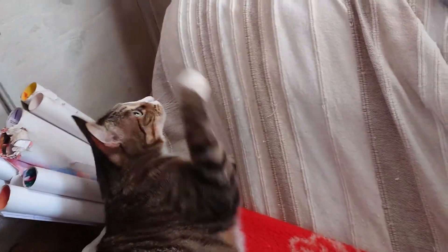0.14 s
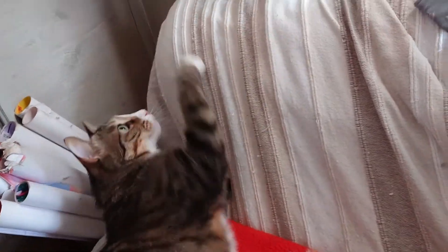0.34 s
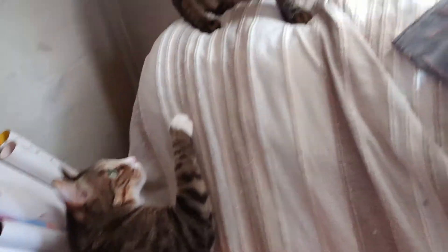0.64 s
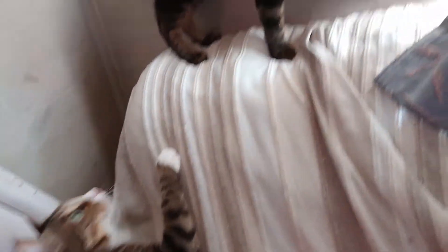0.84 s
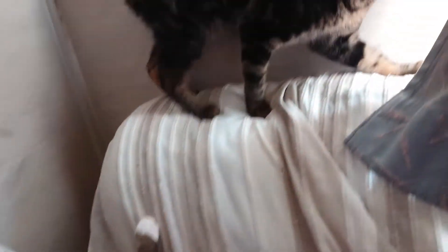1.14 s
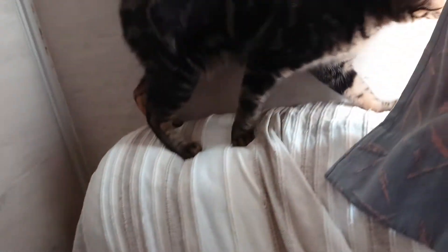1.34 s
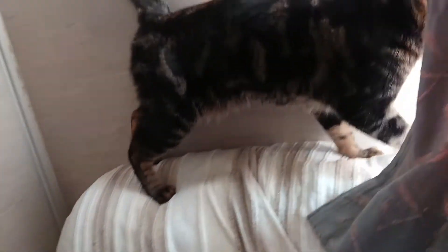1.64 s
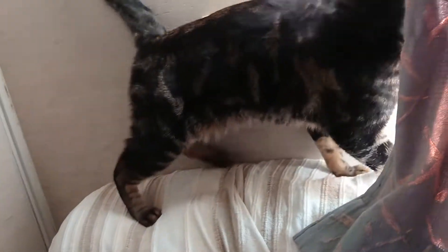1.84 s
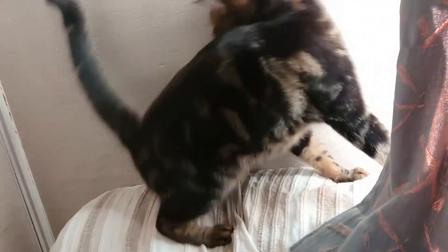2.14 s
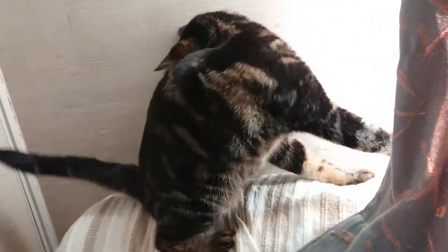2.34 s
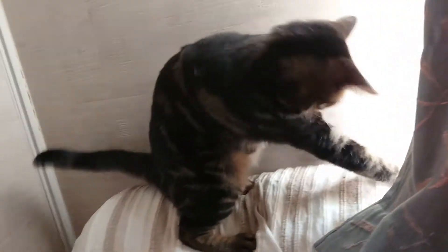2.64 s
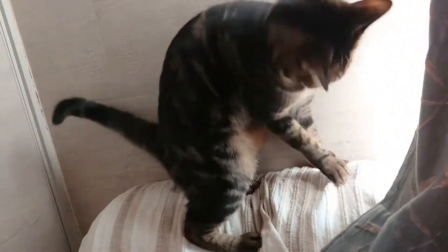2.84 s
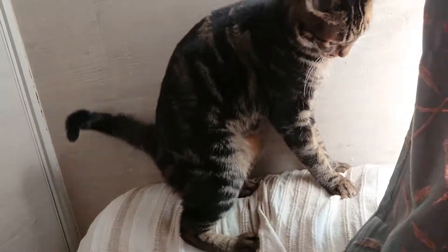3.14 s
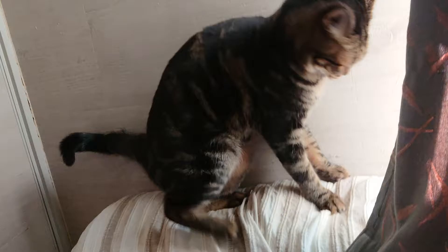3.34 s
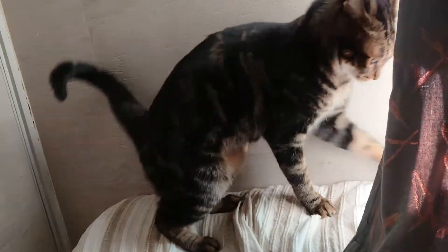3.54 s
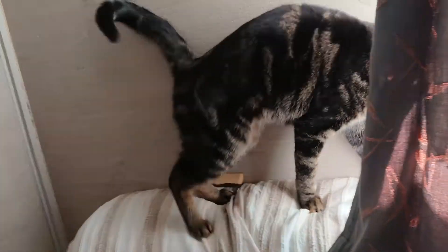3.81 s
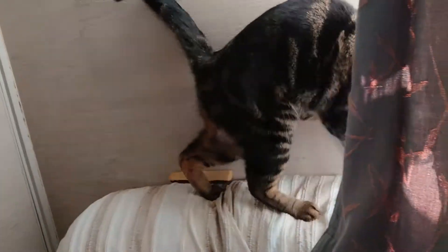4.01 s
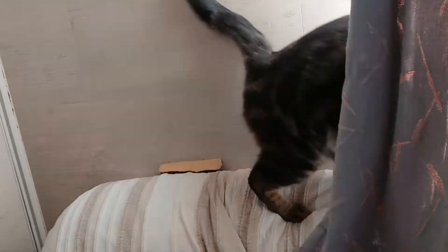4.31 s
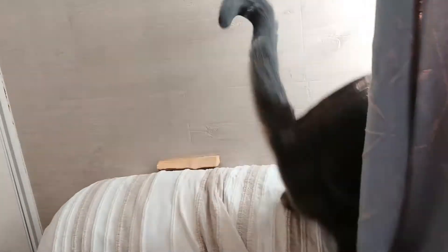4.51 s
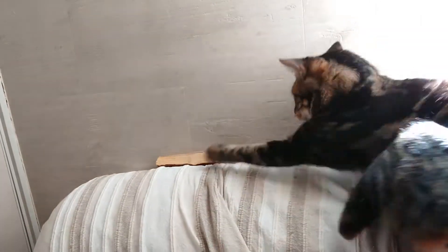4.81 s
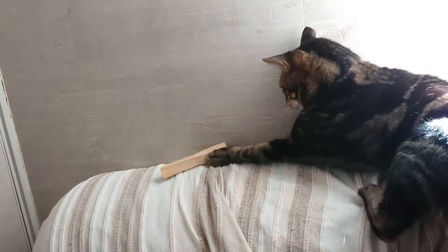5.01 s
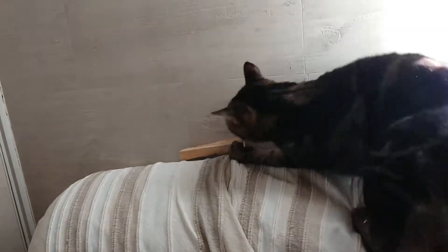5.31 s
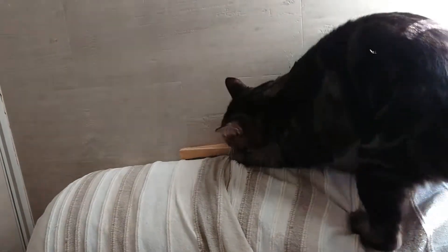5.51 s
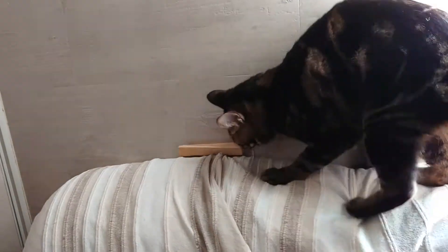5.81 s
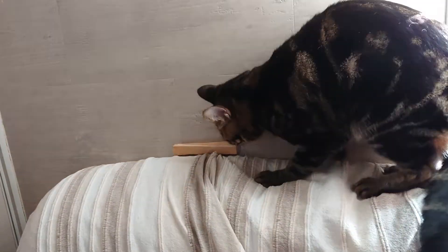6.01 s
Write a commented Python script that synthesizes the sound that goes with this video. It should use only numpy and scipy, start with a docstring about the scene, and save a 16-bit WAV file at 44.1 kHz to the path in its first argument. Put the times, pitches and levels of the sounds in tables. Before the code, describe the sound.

A quiet small room with faint low tone. At about 0.3 s a soft thud is heard, then a sharp wooden knock at 0.45 with a smaller one at 0.57. Until 2 s there is mostly light cloth rub and faint padded thuds. At 2.2-2.4 s a quick rattle of knocks breaks out, led by a hard crack, followed by small taps, low thuds and soft scuffing to 3 s. After a lull, sharp cracks come at 3.7 and 3.8. From 4.3 s scrabbling builds, with a fuller rub at 4.5, dry claw ticks and dull thumps; the strongest knocks fall at 4.87, 5.07 and 5.15, with a thin metallic jingle flickering until about 5.3. Then it calms: isolated taps at 5.4, 5.65 and 5.84 and a faint airy brush. Close stereo pickup, short dense echoes, knocks slightly louder at the right.

```python
"""A soft thud over faint room tone is heard first, then sharp knocks: two cats climb and paw about on a
cloth-covered sofa in a small room and bat a wooden block against the wall. Each blow is a damped wooden
knock, a claw crack that rings the wood and a snap of threads, with dense echoes; bright claw ticks stay dry.
A cat's weight rings the sofa frame, filtered noise makes the cloth rub, narrow resonances make a small
metal thing jingle faintly, and a two-port microphone colours it all."""
import sys
import numpy as np
from scipy import signal
from scipy.fft import rfft, irfft
from scipy.io import wavfile

SR = 44100
rng = np.random.default_rng(int(sys.argv[2]) if len(sys.argv) > 2 else 0)


def master(y):
    """Save y as 16-bit WAV."""
    cut = np.clip(np.atleast_2d(y).T, -1, 1)
    pcm = np.round(cut * 32767)  # scale
    wavfile.write(sys.argv[1], SR, pcm.astype(np.int16))


N = 271656

# Source levels in the tables hold ahead of the stereo balance and the microphone.
# Blows: (time [s], knock peak [dB], knock pitch [Hz], crack rms over its first 5 ms [dB],
#         crack pitch [Hz], snap rms over its first 5 ms [dB])
BLOWS = [(0.442, -23, 606, -48.5, 2900, -66.5), (0.448, -38, 610, -51, 2130, -79),
         (0.512, -44.5, 335, -59.5, 1840, -67), (0.571, -30.5, 693, -60, 2070, -82),
         (0.5745, -31, 399, -71, 2000, -80), (1.626, -45, 269, -69, 2130, -87),
         (1.952, -54.5, 484, -70, 2160, -84), (2.182, -35, 320, -67, 2190, -72),
         (2.245, -23.5, 667, -38, 2120, -76), (2.267, -33, 584, -53, 2400, -66),
         (2.275, -26, 590, -66, 2100, -75), (2.293, -27, 574, -62, 2130, -74),
         (2.299, -38, 630, -57, 2200, -72), (2.307, -35.5, 590, -66, 1500, -80),
         (2.364, -37, 534, -86, 2200, -81), (2.437, -43, 333, -78, 2620, -81),
         (2.478, -44, 400, -62.5, 3020, -74), (2.527, -43.5, 358, -63, 2300, -66),
         (2.636, -65, 340, -58, 2530, -65), (2.656, -42.5, 304, -89, 2100, -67),
         (2.773, -43, 350, -61, 3520, -56), (2.883, -45, 380, -60, 2440, -72),
         (2.903, -43, 530, -80, 1900, -68), (2.929, -42, 480, -66, 1900, -65),
         (3.474, -47, 455, -65.5, 2220, -65.5), (3.573, -48.5, 613, -65.5, 2800, -80),
         (3.6755, -35, 430, -59, 1500, -69), (3.6775, -28.5, 473, -36.5, 1660, -55),
         (3.68, -56, 372, -35, 2290, -67), (3.697, -47, 480, -69, 2250, -80),
         (3.706, -34, 490, -73, 1990, -84), (3.79, -34, 785, -43, 1590, -82),
         (3.797, -41, 610, -55, 2780, -79), (3.811, -42, 600, -78, 1500, -80),
         (3.864, -41.5, 640, -67, 2080, -74), (3.903, -46, 603, -68, 2190, -80),
         (4.277, -51, 251, -63.5, 2550, -63), (4.316, -51.5, 324, -65.5, 1990, -78),
         (4.408, -39, 297, -69, 2000, -84), (4.423, -65, 300, -62, 2760, -77),
         (4.449, -41, 543, -57, 2840, -70), (4.473, -41.5, 290, -60.5, 2780, -82),
         (4.529, -37, 296, -53, 2130, -62.5), (4.577, -34.5, 327, -53.5, 2950, -62),
         (4.631, -46.5, 456, -67, 2490, -77), (4.68, -34.5, 310, -62, 2820, -65),
         (4.689, -41, 397, -66, 2820, -77), (4.784, -30.5, 910, -52.5, 2600, -74),
         (4.828, -33.5, 338, -51.5, 2860, -61), (4.871, -25.5, 372, -35, 2780, -56),
         (4.882, -26, 730, -36, 2190, -50.5), (4.915, -34, 730, -64, 1700, -70),
         (4.977, -33, 298, -47, 1700, -57), (5.068, -23.5, 623, -43.5, 2210, -63),
         (5.1535, -20.5, 580, -44, 2450, -64), (5.238, -37, 363, -45.5, 3140, -55),
         (5.39, -49, 294, -65.5, 2500, -76), (5.635, -47.5, 406, -59, 1880, -71),
         (5.687, -37.5, 270, -54, 2120, -45.5), (5.8405, -28.5, 330, -49, 3120, -57)]
# Modes of the wood that every crack rings: (frequency [Hz], level [dB], t60 of a crack at 2 kHz [s])
WOOD_MODES = [(860, 8, 0.045), (1050, 5.5, 0.037), (1454, 9.5, 0.012), (1812, 12.5, 0.0063),
              (2300, -6.5, 0.031), (2510, -8, 0.041), (2780, -2.5, 0.027), (3120, -3.5, 0.013)]
WOOD_DB = 0.5   # ring against the crack
WOOD_REACH_DB = 11   # loss per octave away from the crack pitch, for a crack at 2 kHz
WOOD_SPREAD_DB = 2.5   # each blow strikes the modes unevenly
WOOD_TOP_HZ = 3350   # the wood passes little that is brighter
SPOTS = 5   # blows take turns among this many places
# Bright, dry ticks of claw tips: (time [s], peak level [dB])
TICKS = [(0.4448, -47), (2.246, -40), (2.278, -43), (2.5275, -44.5), (3.6805, -54), (3.793, -52),
         (4.578, -37.5), (4.682, -44.5), (4.786, -42.5), (4.828, -43), (4.873, -31), (5.0677, -39),
         (5.157, -39), (5.636, -44)]
TICK_BAND_HZ, TICK_T60_S = (3000, 6500), 0.016
ALIKE_BELOW_HZ = 500   # the bass of a blow reaches both ports alike
LEFT_LEAD_S, RIGHT_LOUDER_DB = 0.0001, 4.5

# Decay of the reflections: (frequency [Hz], t60 [s])
TAIL_T60 = [(100, 0.17), (400, 0.18), (1100, 0.079), (3000, 0.13), (10000, 0.28)]
# Echo colour, as soft covers swallow treble: (frequency [Hz], level [dB])
ECHO_COLOUR = [(100, -5), (600, -5.5), (1500, 1), (3000, -0.5), (3800, -5.5), (6000, -5), (16000, -15)]
TAIL_DB = -4
# Likeness of the left and right channels of diffuse sound: (frequency [Hz], likeness [0 to 1])
LIKENESS = [(60, 0.71), (250, 0.88), (700, 0.54), (1500, 0.01), (3000, 0.038), (8000, 0.026)]

# Modes of the sofa frame: (frequency [Hz], level [dB], t60 [s])
FRAME_MODES = [(65.8, 3, 0.32), (108, 5, 0.21), (130.1, 0, 0.19), (183.3, -8, 0.27), (226.9, 5, 0.15)]
PANEL_DB = -46   # gain from the blows into the highest frame mode
# Thuds of a cat's weight: (time [s], peak level [dB], pitch that the push favours [Hz])
THUDS = [(0.268, -43.5, 131), (0.448, -39.5, 125), (0.588, -38.5, 111), (1.166, -45, 102),
         (1.238, -45.5, 56.5), (1.625, -42.5, 98), (1.897, -45, 108), (2.056, -40, 114),
         (2.172, -32.5, 119), (2.268, -35.5, 124), (2.654, -29.5, 120), (2.777, -41, 102),
         (2.864, -42.5, 61), (3.467, -38.5, 66), (3.682, -32, 100), (4.032, -47.5, 111), (4.407, -39, 74),
         (4.545, -31.5, 97), (4.68, -40, 84), (4.766, -32.5, 110), (4.876, -32, 227), (5.069, -35.5, 229),
         (5.099, -36, 230), (5.154, -33.5, 131), (5.164, -27.5, 222), (5.239, -42, 219), (5.275, -40, 103),
         (5.389, -47.5, 97), (5.692, -35, 108), (5.845, -34, 114)]

# Single strokes over the cover: (middle [s], half the span [s], rms before the swell [dB], centre [Hz])
STROKES = [(0.853, 0.45, -72.5, 1260), (1.098, 0.46, -72, 5950), (1.24, 0.054, -63.5, 2080),
           (1.54, 0.081, -65, 510), (2.07, 0.08, -60.5, 306), (2.172, 0.037, -64, 2890),
           (2.442, 0.13, -58.5, 550), (2.532, 0.06, -55, 473), (2.778, 0.039, -58, 3940),
           (2.882, 0.037, -62.5, 5100), (2.927, 0.1, -55.5, 506), (3.114, 0.13, -60.5, 487),
           (3.378, 0.062, -71.5, 4500), (3.565, 0.074, -61, 574), (3.921, 0.053, -66, 716),
           (4.267, 0.041, -59.5, 545), (4.458, 0.016, -60.5, 2300), (4.535, 0.037, -49.5, 740),
           (4.597, 0.07, -62, 2770), (4.74, 0.064, -61, 596), (4.906, 0.036, -68, 4300),
           (5.401, 0.084, -67.5, 3840), (5.857, 0.2, -64, 9100)]
STROKE_OCTAVES, OCTAVES_PER_KHZ = 0.84, 0.49   # a brighter stroke is broader
# How much the cats stir the cover: (time [s], level about the mean [dB])
STIR = [(0.0, -1), (0.51, -1), (0.84, -1.5), (1.1, 4), (1.42, 2), (1.94, 0.5), (2.18, 6), (2.37, 1.5),
        (2.76, 1), (3.24, -2), (3.74, 4), (4.1, 3), (4.37, 1), (4.62, 5), (5.06, 5.5), (5.21, 8),
        (5.44, -0.5), (6.16, 0)]
# Spectra of cushion rumble, cloth rub, and hiss of fur and threads: (frequency [Hz], density [dB per Hz])
RUMBLE_SPECTRUM = [(25, -21), (40, -3.5), (62, 9.5), (85, 0), (110, 2.5), (160, -9.5), (230, -8.5),
                   (400, -61.5), (900, -85)]
RUB_SPECTRUM = [(120, -22), (230, 3), (400, 7), (650, 1.5), (1000, -0.5), (1500, -12), (2500, -75)]
HISS_SPECTRUM = [(700, -34), (1300, 1.5), (2500, 0.5), (3500, -7), (5500, -4.5), (8000, -9.5),
                 (11000, -9.5), (16000, -11.5)]
# Level where the stir is 0 dB, and dB of level per dB of stir
RUMBLE_DB, RUMBLE_FOLLOWS = -64.5, 0.97
RUB_DB, RUB_FOLLOWS = -72, 1.57
HISS_DB, HISS_FOLLOWS = -71, 1

# Shakes of the metal: (time of full level [s], hold [s], low partial level [dB], high partial level [dB])
SHAKES = [(4.885, 0.0024, -75, -46.5), (5.063, 0.0023, -54, -51), (5.086, .055, -68, -59.5),
          (5.155, .002, -74, -46), (5.175, 0.029, -75, -72), (5.255, 0.027, -89, -71),
          (5.289, 0.068, -70.5, -78)]
SHAKE_RISE_S, SHAKE_FALL_DB_PER_S = 0.0015, 1298
JINGLE_HZ, JINGLE_T60_S, TOUCHES_PER_S = (2270, 5600, 5150), 0.04, 1200
SIDE_PARTIAL_DB = 10   # the third partial sits this far under the high one

# Room tone: (frequency [Hz], density [dB per Hz])
ROOM_TONE = [(25, -35), (60, -5), (120, -3), (250, -8), (500, -20), (1000, -20.5), (2500, -32), (5000, -33),
             (10000, -39), (16000, -30)]
ROOM_TONE_DB = -66.5
# Microphone resonances, one list per port, left and right: (frequency [Hz], width [Hz], level [dB])
PORTS = [
    [(7910, 2220, -30), (10710, 2700, 15.5), (1990, 1640, -1.5)],
    [(7420, 1920, -20.5), (10200, 960, 7.5), (2180, 12000, -0.5)],
]
CUTOFF_HZ = 15800


def amp(db):
    """Decibels: twenty of them are a tenfold amplitude."""
    return 10 ** (np.asarray(db) / 20)


def rms_one(x, size=None):
    """Energy normalisation: scale to rms 1 over the first samples."""
    return x / np.sqrt(np.mean(x[..., :size] ** 2) + 1e-20)


def at_hz(points, hz):
    """Linear interpolation of a table on a log-frequency axis."""
    table = np.array(points)
    return np.interp(np.log(hz), np.log(table[:, 0]), table[:, 1])


def drift(rate):
    """Random fluctuation: straight lines between normal values of spread 1, drawn `rate` times a second."""
    knots = rng.standard_normal(600)
    return np.interp(np.arange(N) / SR * rate, np.arange(len(knots)), knots)


def ring(x, hz, t60):
    """Damped resonance: a unit click sets a decaying sine of height 1 ringing."""
    radius, w = amp(-60 / (t60 * SR)), 2 * np.pi * hz / SR
    return signal.lfilter([0, np.sin(w)], [1, -2 * radius * np.cos(w), radius * radius], x)


def band(x, low_hz, high_hz):
    """Band limitation: a Butterworth band-pass."""
    return signal.sosfilt(signal.butter(2, [low_hz, high_hz], "band", fs=SR, output="sos"), x)


def stereo(mid, side, spectrum):
    """Interchannel coherence: a mid and a side noise, mixed by likeness and coloured, at rms 1."""
    size = mid.shape[-1]
    hz = np.maximum(np.fft.rfftfreq(size, 1 / SR), 1)
    alike = np.clip(at_hz(LIKENESS, hz), 0, 1)
    sign = np.array([[1], [-1]])
    both = np.sqrt(1 + alike) * rfft(mid) + np.sqrt(1 - alike) * rfft(side) * sign
    return rms_one(irfft(both * amp(at_hz(spectrum, hz)), size))


def wood_ring(crack, crack_hz):
    """Modal excitation: a crack rings most the modes near its pitch; a brighter one is choosier and shorter."""
    bright = crack_hz / 2000
    wood = 0
    for mode_hz, db, t60 in WOOD_MODES:
        octaves_off = abs(np.log2(mode_hz / crack_hz))
        level_db = db + WOOD_SPREAD_DB * rng.standard_normal()
        level_db -= WOOD_REACH_DB * bright ** 2 * octaves_off
        wood = wood + amp(level_db) * ring(crack, mode_hz, t60 / bright)
    return wood


def blows():
    """Impact: contact rings a knock and noise bursts crack and snap; a row per spot, the last row echoless."""
    out, size, early = np.zeros((SPOTS + 1, N + SR)), SR // 10, SR // 200
    t = np.arange(size) / SR
    dull = signal.butter(8, WOOD_TOP_HZ, fs=SR, output="sos")
    burst = np.clip(t / 0.002, 0, 1) ** 6
    for k, (s, knock_db, knock_hz, crack_db, crack_hz, snap_db) in enumerate(BLOWS):
        # a duller knock has a longer contact; pressure follows the acceleration of the wood
        contact = np.exp(-0.5 * ((t - 0.0012 - 0.47 / knock_hz) * knock_hz / 0.12) ** 2)
        knock = -np.gradient(ring(contact, knock_hz, 4.84 / knock_hz))
        knock = amp(knock_db) * knock / np.abs(knock).max()

        noise = rng.standard_normal((2, size))
        noise[:, round(0.002 * SR)] = -16, -7   # the claw lets go with one sharp click, fibres follow
        fading = noise[0] * burst * amp(-60 * t * crack_hz / 34.0)
        crack = band(fading, crack_hz / 4.1, crack_hz * 2.0)
        wood = wood_ring(crack, crack_hz)
        crack = rms_one(crack, size=early) + amp(WOOD_DB) * rms_one(wood, size=early)
        crack = amp(crack_db) * rms_one(signal.sosfilt(dull, crack), size=early)

        snap = band(noise[1] * burst * amp(-60 * t / 0.013), 2700, 15000)
        snap = signal.lfilter([1], [1, -0.5], snap)   # threads snap strongest at the low end of their band
        snap = amp(snap_db) * rms_one(snap, size=early)

        # the cover swallows part of the echo of the brighter cracks
        echoless = np.clip(2 * (crack_hz / 2000 - 1.1), 0, 0.7) * crack
        at = round(s * SR)
        out[k % SPOTS, at:at + size] += knock + crack - echoless
        out[-1, at:at + size] += echoless + snap   # snaps are too thin to echo
    return out[:, :N]


def ticks():
    """Transient: each claw tick is a few milliseconds of bright, fading noise."""
    out, size = np.zeros(N + SR), SR // 40
    fade = amp(-60 * np.arange(size) / SR / TICK_T60_S)
    for s, db in TICKS:
        tick = band(rng.standard_normal(size) * fade, *TICK_BAND_HZ)
        at = round(s * SR)
        out[at:at + size] += amp(db) * tick / np.abs(tick).max()
    return out[:N]


def direct(x):
    """Interaural cues: above the bass, sound reaches the left port first but is louder at the right."""
    bass = signal.sosfilt(signal.butter(1, ALIKE_BELOW_HZ, fs=SR, output="sos"), x)
    upper = x - bass
    late = np.interp(np.arange(N) - LEFT_LEAD_S * SR, np.arange(N), upper)
    balance = amp([[-RIGHT_LOUDER_DB / 2], [RIGHT_LOUDER_DB / 2]])
    return bass + np.array([upper, late]) * balance


def reflections(x):
    """Reverberation: wall and sofa throw each blow back as dense echoes that die band by band."""
    size, edges = SR // 2, 70 * 2.0 ** np.arange(9)   # octave bands from 70 Hz
    t = np.arange(size) / SR
    echoes = stereo(*rng.standard_normal((2, size)), ECHO_COLOUR)
    tail = 0
    for k, (low, high) in enumerate(zip(edges, edges[1:])):
        decay = amp(-60 * t / at_hz(TAIL_T60, np.sqrt(low * high)))
        tail = tail + (-1) ** k * band(echoes, low, high) * decay
    tail *= np.clip(t / 0.00021 - 0.4, 0, 1)   # echoes set in over the first 0.3 ms
    tail /= np.sqrt(np.sum(tail ** 2) / 2)
    return amp(TAIL_DB) * signal.fftconvolve(x[None], tail, axes=1)[:, :N]


def panel(x):
    """Sympathetic resonance: the blows also ring the highest frame mode."""
    hz, _, t60 = FRAME_MODES[-1]
    return amp(PANEL_DB) * ring(x, hz, t60)


def thuds():
    """Modal excitation: a soft push sets the frame modes ringing, most those near its pitch."""
    out, size = np.zeros(N + SR), SR // 2
    t = np.arange(size) / SR
    push = np.exp(-0.5 * ((t - 0.0015) / 0.00048) ** 2)
    for s, peak_db, hz in THUDS:
        thud = 0
        for mode_hz, db, t60 in FRAME_MODES:
            level_db = db + 3 * rng.standard_normal() - 11 * abs(np.log2(mode_hz / hz))
            thud = thud + amp(level_db) * ring(push, mode_hz, t60)
        at = round(s * SR)
        out[at:at + size] += amp(peak_db) * thud / np.abs(thud).max()
    return out[:N] * amp([[0.8], [-0.8]])   # slightly louder at the left


def strokes():
    """Friction noise: each stroke is a swell of lumpy noise around its own pitch."""
    out, lumps = np.zeros((2, N)), amp(4.3 * drift(70))
    for s, half_span, db, hz in STROKES:
        octaves = STROKE_OCTAVES + OCTAVES_PER_KHZ * hz / 1000   # width between the -3 dB points
        half, foot = 2 ** (octaves / 2), 4 ** octaves
        hill = [(hz / foot, -48), (hz / half, -3), (hz, 0), (hz * half, -3), (hz * foot, -48)]
        at, size = round((s - half_span) * SR), round(2 * half_span * SR)
        noise = rng.standard_normal((2, size))
        out[:, at:at + size] += amp(db) * np.hanning(size) ** 2 * stereo(*noise, hill)
    return out * lumps


def grainy(spectrum, per_s, size_db, flicker_db, flicker_rate):
    """Stick-slip: fibres slip one by one, as clicks of uneven size over a flickering bed of noise."""
    slips = rng.random(N) < per_s / SR
    sizes = amp(size_db * np.minimum(rng.exponential(1, N), 3)) * slips
    grains = rng.standard_normal((2, N)) * (1 + rms_one(sizes))
    return stereo(*grains, spectrum) * amp(flicker_db * drift(flicker_rate))


def cloth():
    """Friction noise: cushion rumble, cloth rub, and hiss of fur and threads follow the cats' stir."""
    times, levels = np.transpose(STIR)
    stir_db = np.interp(np.arange(N) / SR, times, levels)
    rumble = grainy(RUMBLE_SPECTRUM, per_s=90, size_db=4.5, flicker_db=4.5, flicker_rate=51)
    rub = grainy(RUB_SPECTRUM, per_s=530, size_db=0.0, flicker_db=3.5, flicker_rate=44)
    hiss = grainy(HISS_SPECTRUM, per_s=6000, size_db=1.2, flicker_db=1.5, flicker_rate=32)
    return (amp(RUMBLE_DB + RUMBLE_FOLLOWS * stir_db) * rumble
            + amp(RUB_DB + RUB_FOLLOWS * stir_db) * rub
            + amp(HISS_DB + HISS_FOLLOWS * stir_db) * hiss)


def jingle():
    """Narrow resonance: uneven touches ring thin metal; each shake rises, holds and dies."""
    t, out = np.arange(N) / SR, 0
    touches = rng.standard_normal((2, N)) * (rng.random(N) < TOUCHES_PER_S / SR)
    touches = touches[0] + 5.5 * touches   # mostly separate touches at the two ports, partly shared
    for k, hz in enumerate(JINGLE_HZ):
        level = 0
        for s, held, low_db, high_db in SHAKES:
            db = (low_db, high_db, high_db - SIDE_PARTIAL_DB)[k]
            fall_db = SHAKE_FALL_DB_PER_S * np.maximum(t - s - held, 0)
            rise = np.clip((t - s) / SHAKE_RISE_S + 1, 0, 1)
            level = level + amp(db - fall_db) * rise
        partial = ring(ring(touches, hz, JINGLE_T60_S), hz, 0.004)
        out = out + level * rms_one(partial)
    return out


def room_tone():
    """Stationary noise: a steady, coloured background."""
    return amp(ROOM_TONE_DB) * stereo(*rng.standard_normal((2, N)), ROOM_TONE)


def scene():
    """Superposition: blows with ticks and echoes, frame, cloth, jingle and room tone add up."""
    spots = blows()
    hits = spots.sum(axis=0)
    echoes = sum(reflections(spot) for spot in spots[:-1])   # every spot has echo paths of its own
    block = direct(hits + ticks()) + echoes
    sofa = panel(hits) + thuds() + strokes() + cloth()
    return block + sofa + jingle() + room_tone()


def record(dry):
    """Port resonance: each port dips and peaks in the treble; the deepest bass and the top are cut."""
    out = []
    for x, port in zip(dry, PORTS):
        for hz, width_hz, db in port:
            w, g = 2 * np.pi * hz / SR, amp(db / 2)
            a = np.sin(w) * width_hz / hz / 2
            zeros = [1 + a * g, -2 * np.cos(w), 1 - a * g]
            poles = [1 + a / g, -2 * np.cos(w), 1 - a / g]
            x = signal.lfilter(zeros, poles, x)
        out.append(x)
    out = signal.sosfilt(signal.butter(4, 42, "high", fs=SR, output="sos"), out)
    return signal.sosfilt(signal.ellip(12, 0.5, 70, CUTOFF_HZ, fs=SR, output="sos"), out)


dry = scene()
out = record(dry)
master(out)
```